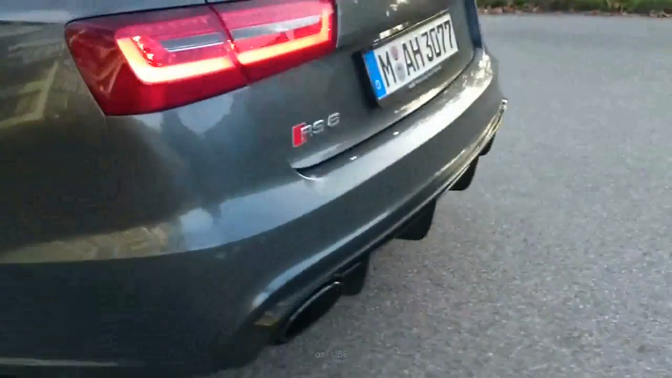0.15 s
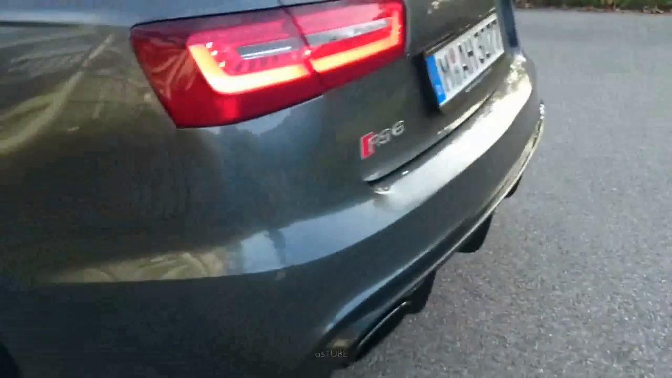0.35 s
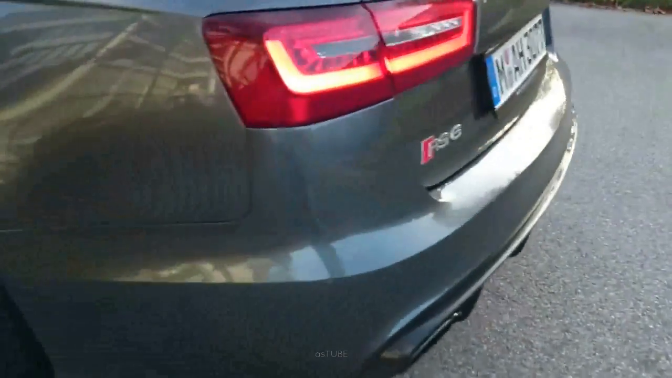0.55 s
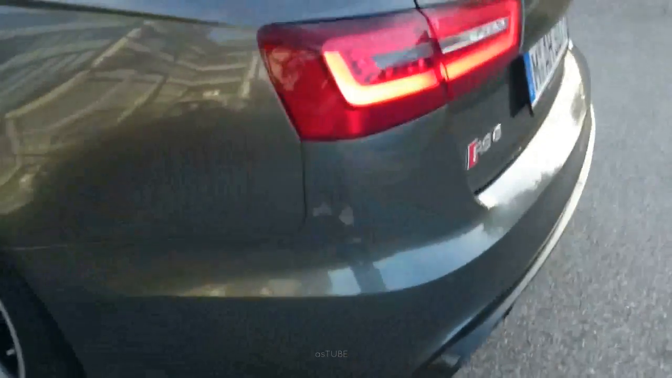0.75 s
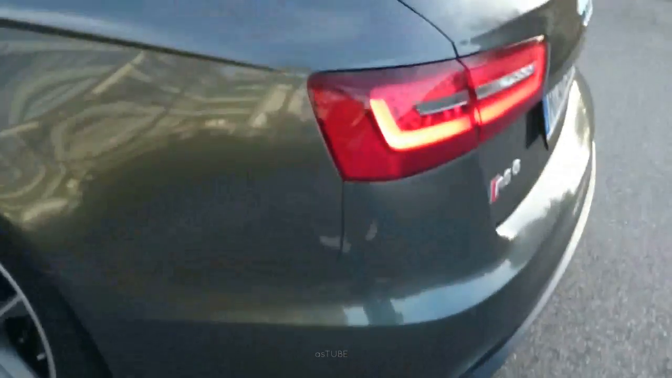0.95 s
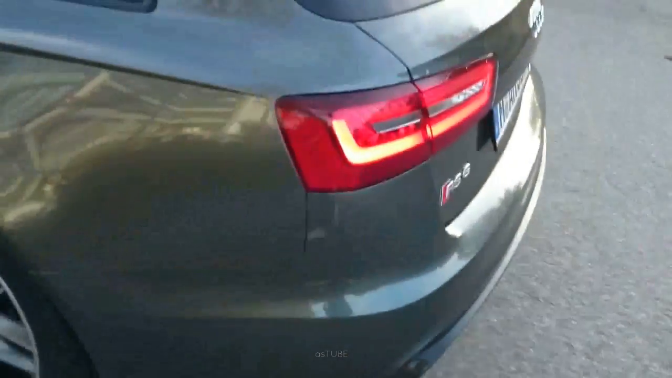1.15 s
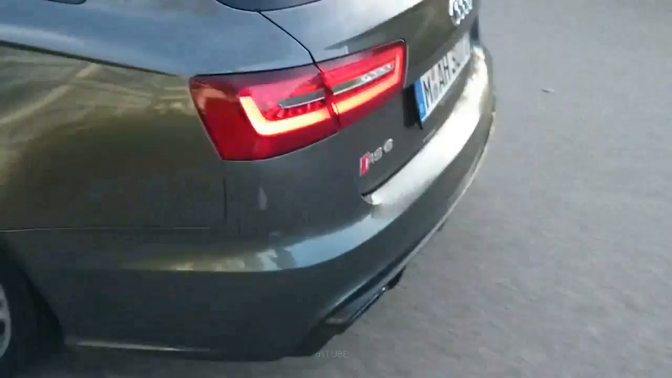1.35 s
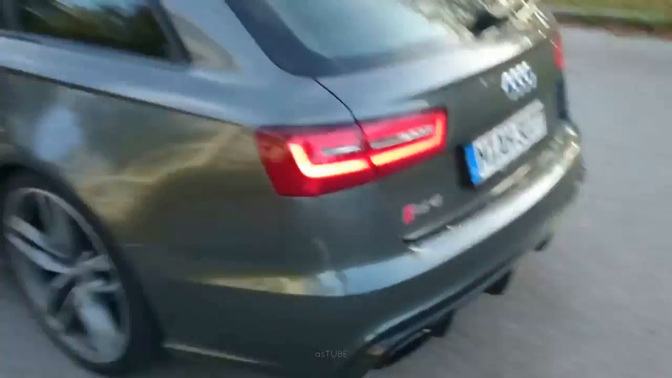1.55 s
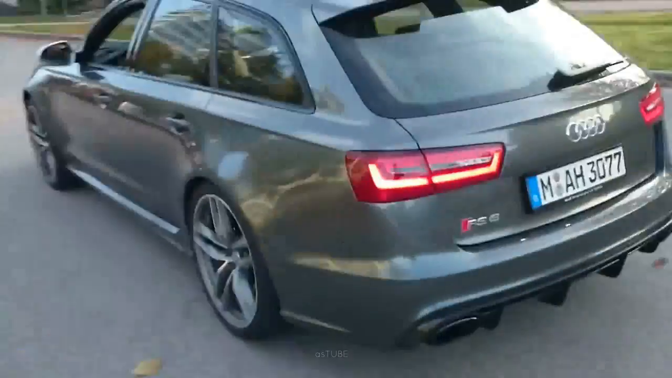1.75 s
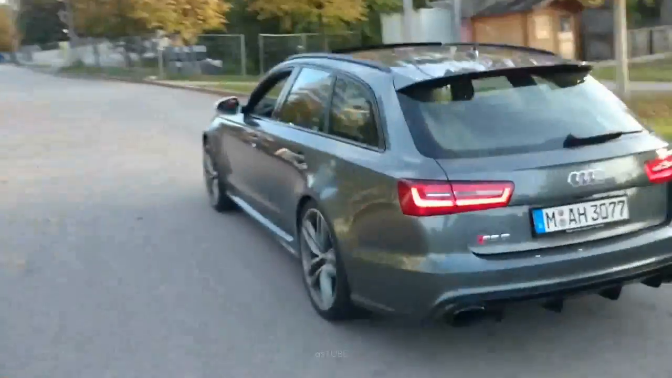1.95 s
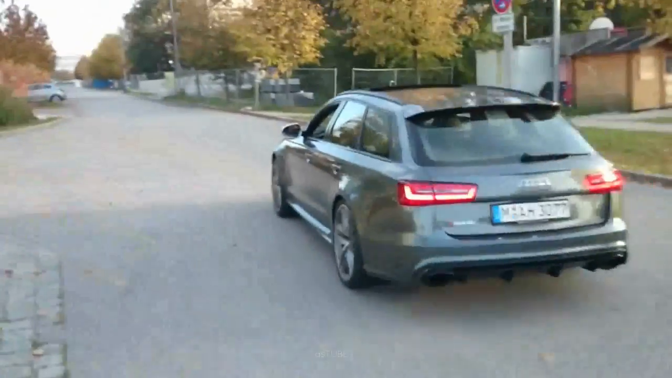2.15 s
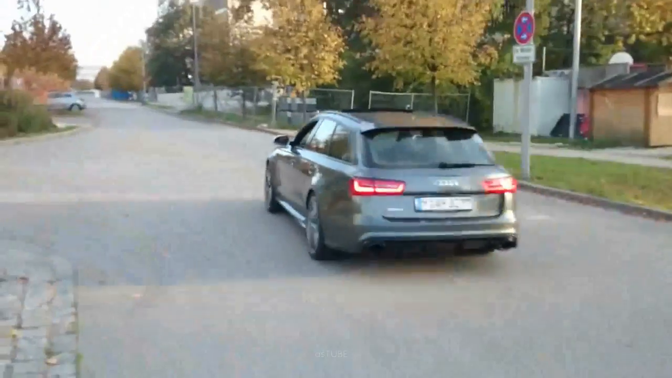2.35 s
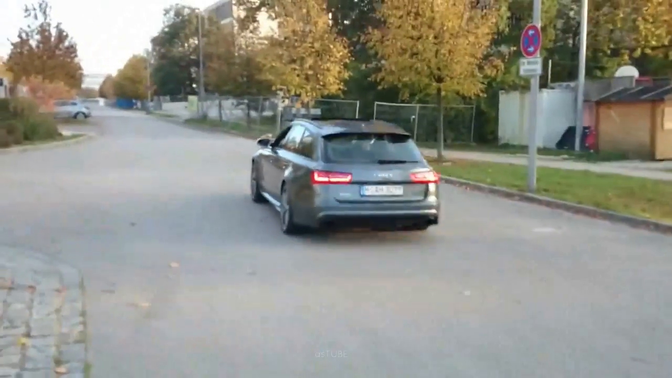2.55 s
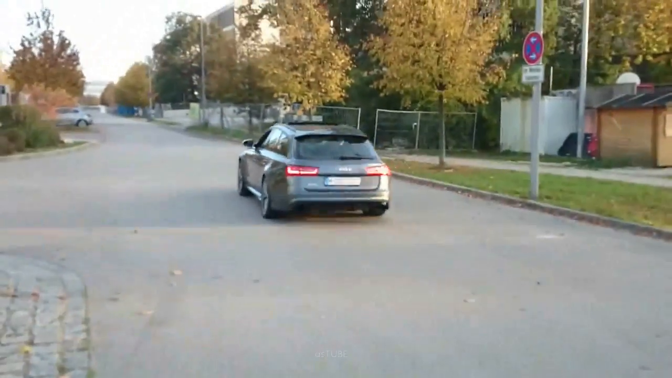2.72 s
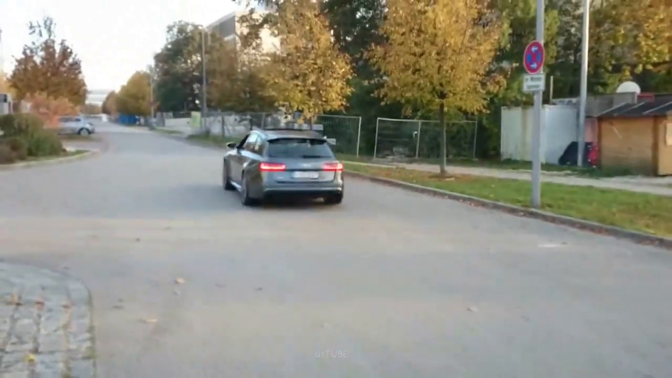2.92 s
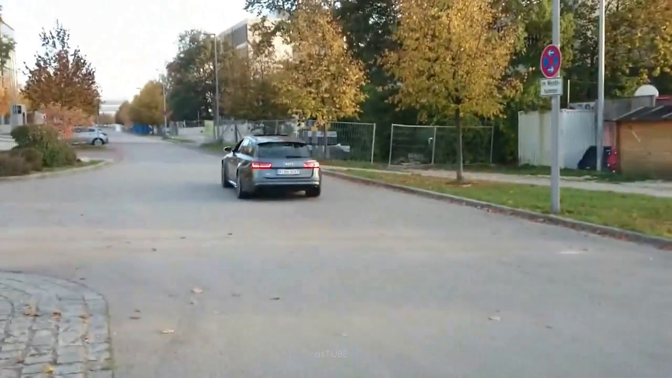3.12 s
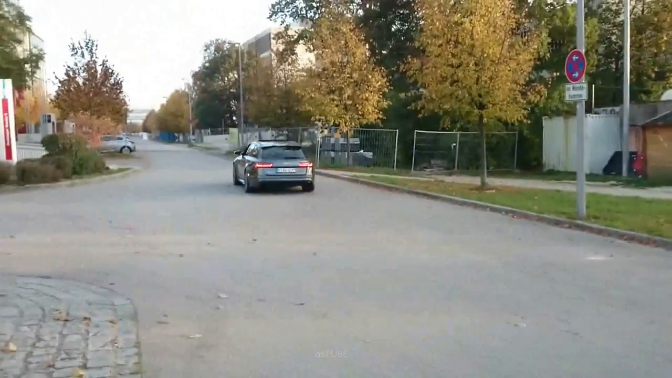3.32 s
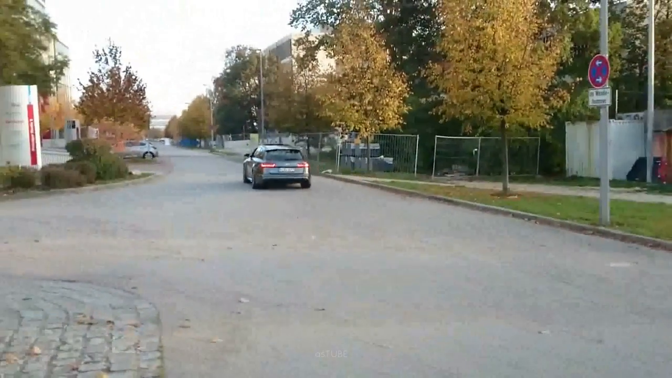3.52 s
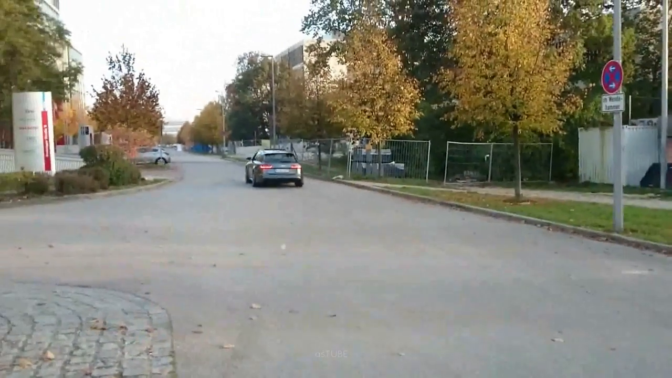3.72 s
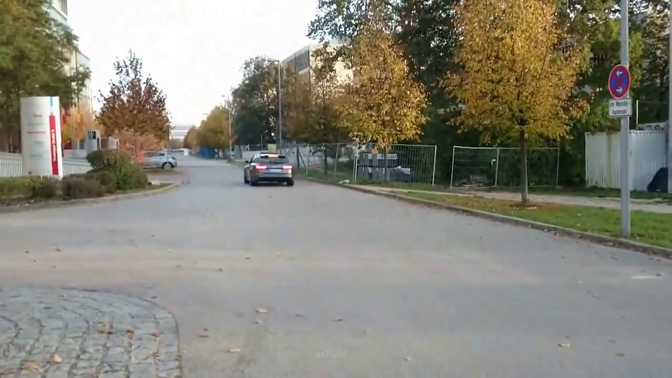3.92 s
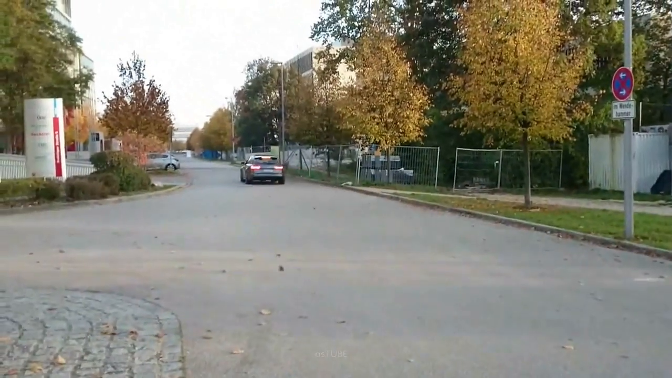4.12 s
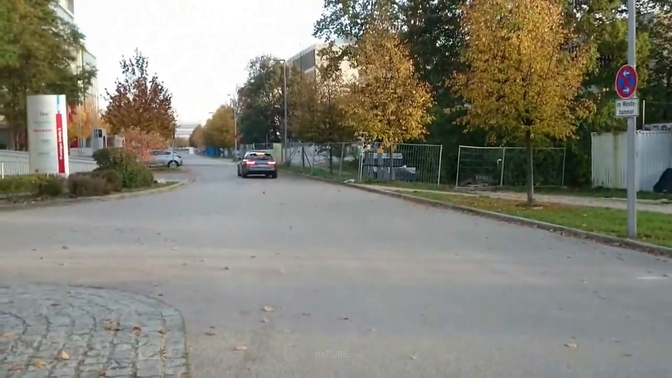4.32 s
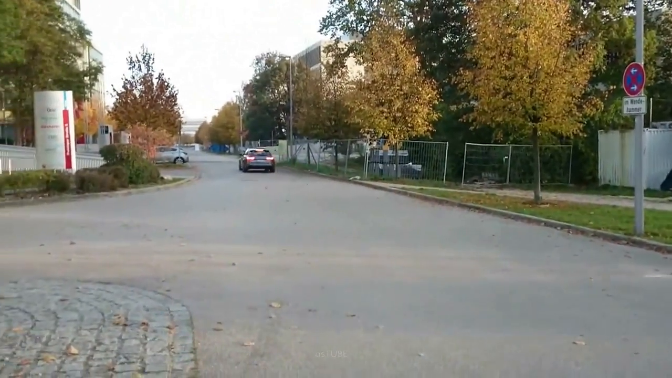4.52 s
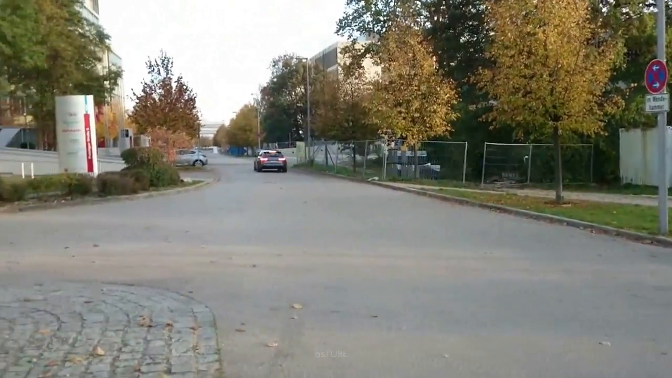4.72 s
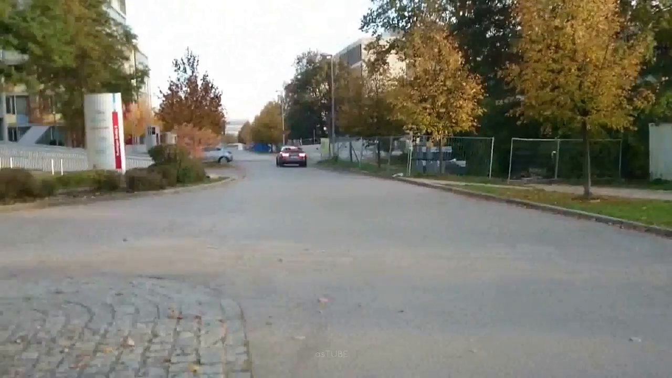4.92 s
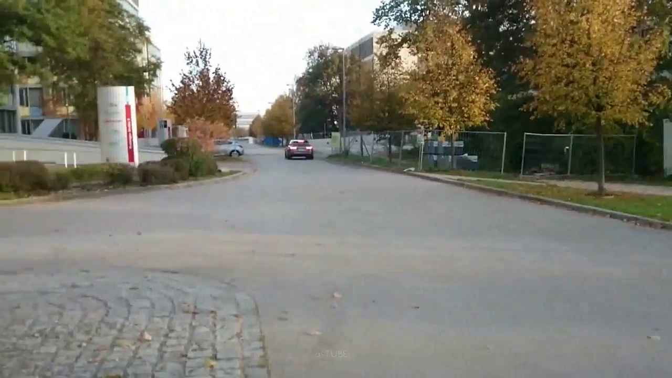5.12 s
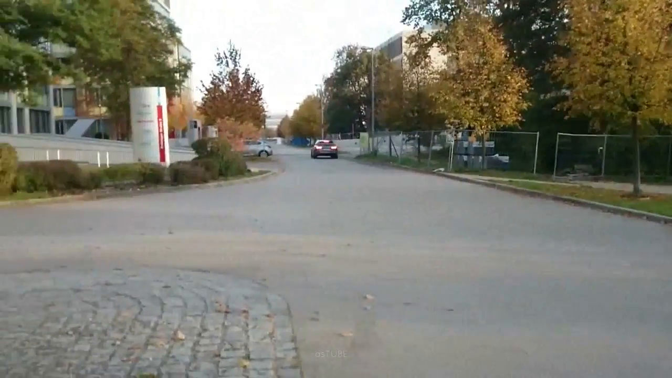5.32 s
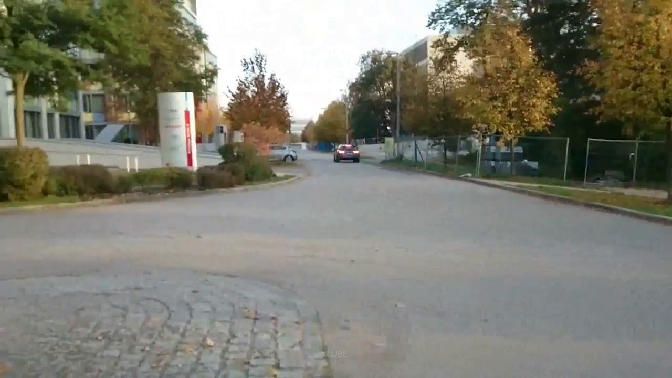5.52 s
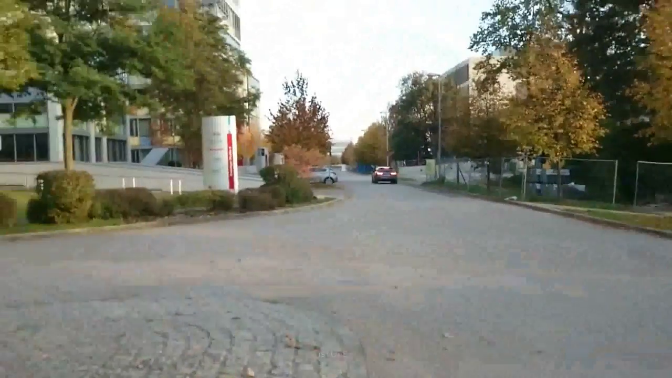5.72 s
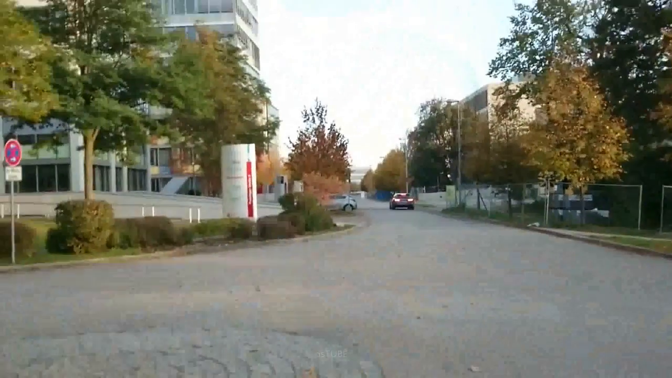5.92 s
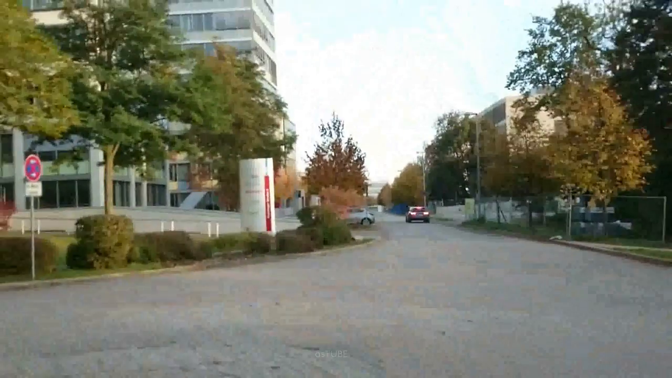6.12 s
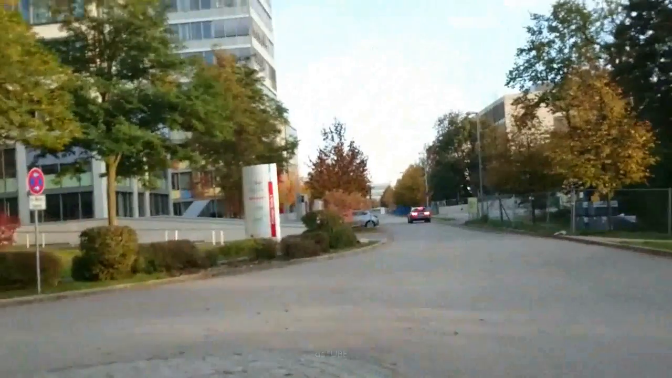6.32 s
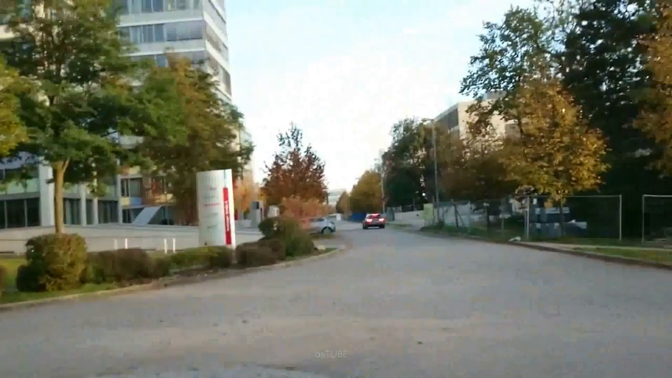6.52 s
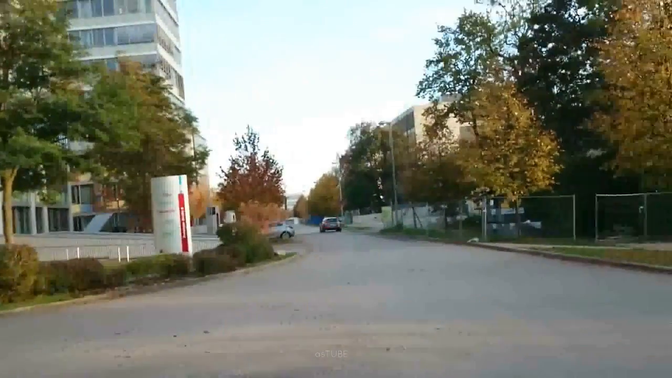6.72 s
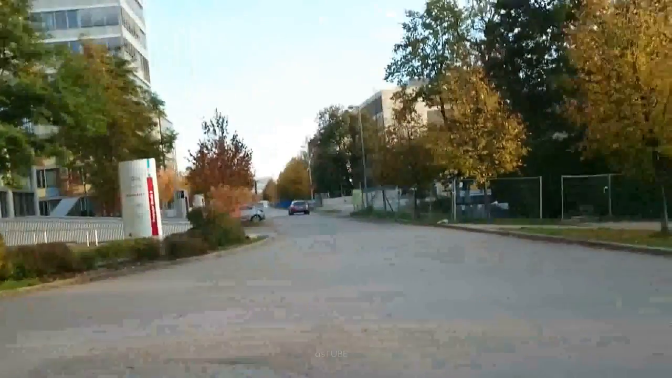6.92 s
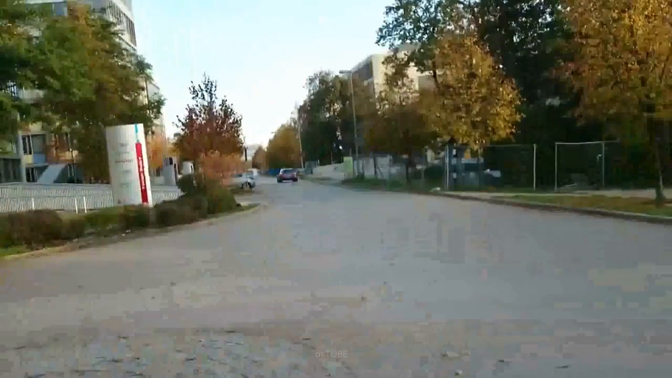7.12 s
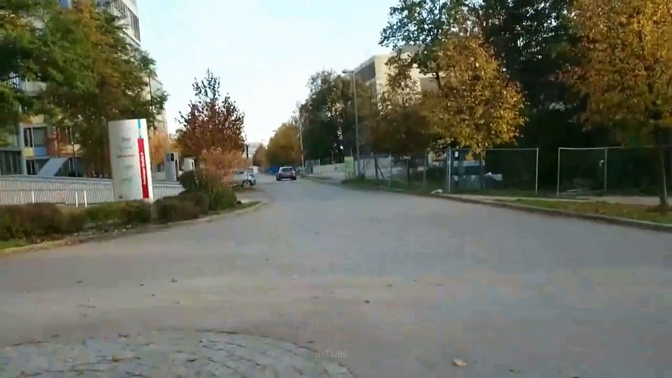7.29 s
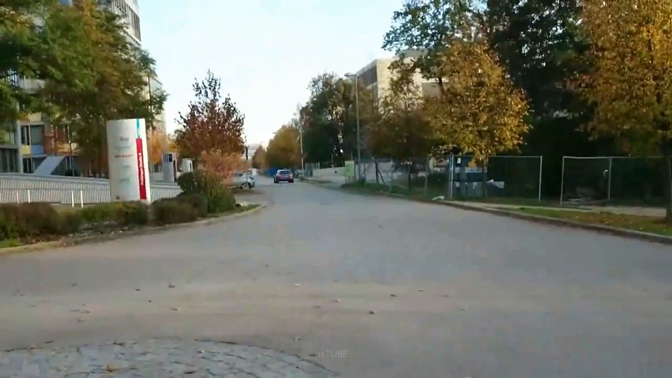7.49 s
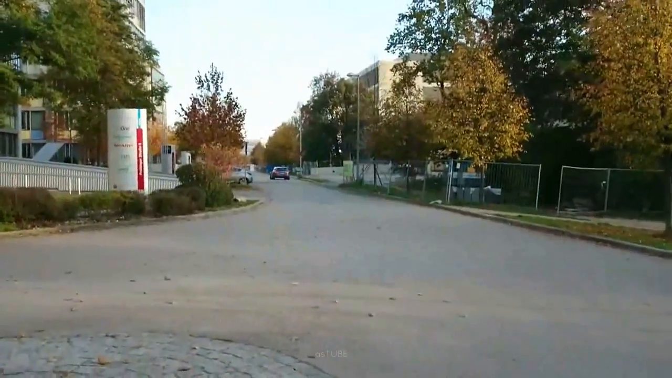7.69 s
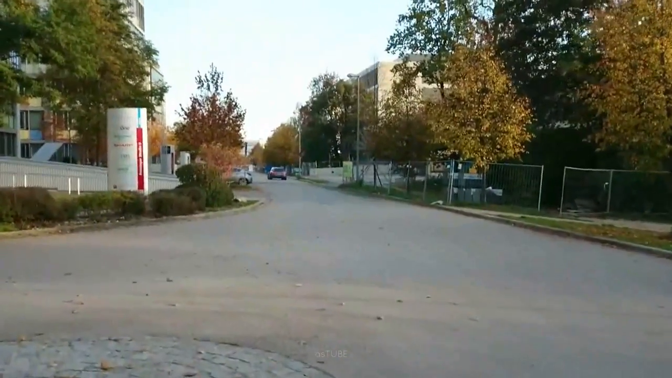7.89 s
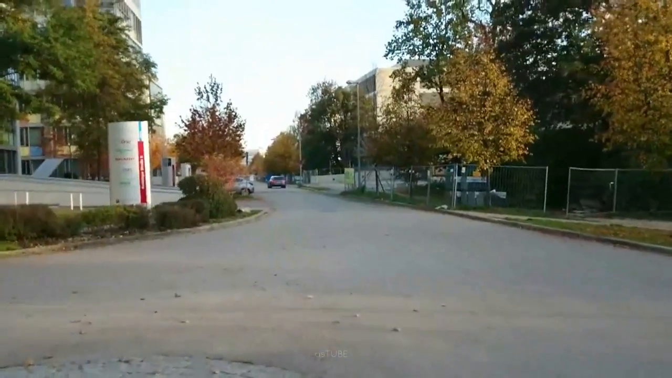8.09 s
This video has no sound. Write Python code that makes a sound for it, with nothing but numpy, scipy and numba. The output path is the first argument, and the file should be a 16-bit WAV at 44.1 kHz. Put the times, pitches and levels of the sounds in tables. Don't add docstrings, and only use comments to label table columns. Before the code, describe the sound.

Close to a handheld phone, a turbocharged V8 idles softly and unevenly for a second, then barks and pulls away, climbing into a raspy roar with bright turbine hiss. A brief ignition cut marks the upshift; the driver lifts and the exhaust crackles. Tyre roar recedes, a far blip brings more pops, and the quiet street remains, with wall echoes and light wind rumble.

```python
import sys
import numpy as np
from scipy import signal
from scipy.fft import rfft, irfft, next_fast_len
from scipy.io import wavfile
from scipy.ndimage import uniform_filter1d
from numba import njit

SR = 44100
rng = np.random.default_rng(int(sys.argv[2]) if len(sys.argv) > 2 else 0)


def voltage_ratio(level):
    return 10 ** (np.asarray(level, float) / 20)


def wav_record(signal):
    frames = np.transpose(np.atleast_2d(signal))
    bounded = np.clip(frames, -1, 1)
    quanta = np.round(bounded * 32767).astype(np.int16)
    wavfile.write(sys.argv[1], SR, quanta)


N = 359396
PADDED = next_fast_len(N, real=True)
T = np.arange(N) / SR

# start in seconds, state of the engine.
PEDAL = [(0, "idle"), (1.065, "pull"), (3.615, "cut"), (3.71, "pull"), (4.01, "lift"), (4.36, "overrun"),
         (5.08, "coast"), (5.2, "drone"), (5.62, "coast"), (5.84, "blip"), (6.08, "overrun"),
         (6.74, "coast"), (7.18, "drone"), (7.6, "feather")]
SHIFT_S, LIFT_S = PEDAL[2][0], PEDAL[4][0]


def by_state(table):
    starts, states = zip(*PEDAL)
    now = np.searchsorted(starts, T, side="right") - 1
    values = np.array([table[state] for state in states], float)[now].T
    return uniform_filter1d(values, int(0.045 * SR), mode="nearest")


# tilt in dB per order, roughness from 0 to 1.
BURN = dict(idle=(0, .12), pull=(0, .08), cut=(-.5, .2), lift=(-1.5, .6), overrun=(-1.8, .85),
        coast=(-4.5, .15), drone=(-6, .06), blip=(0, .1), feather=(.3, .08))
# frequency in Hz, level in dB per Hz.
RASP = [(150, -15.5), (250, -6), (308, -12), (412, -10), (490, -5.5), (576, -3), (770, -12), (983, -8.5),
        (1820, -18.5), (4000, -19), (5200, -19.5), (8800, -120)]
# frequency in Hz, level in dB per Hz.
JET = [(1470, -9), (2500, -11), (3320, -20), (4430, -14.5), (4860, -5), (5250, -0.5), (5450, 3.5),
       (5930, -2), (6850, -8.5), (8490, -6), (8950, -12), (10400, -15), (11200, -21), (13000, -14),
       (15500, -25)]
LOAD_START_S, LOAD_FULL_S = 1.06, 1.16
BITE_S = 1.12
STRONGEST_S, GUST_S = 0.301, 1.698


def engine():
    hz = revs()
    cycles = np.cumsum(hz) / SR
    since_strongest = cycles - cycles[int(STRONGEST_S * SR)]
    since_gust = cycles - cycles[int(GUST_S * SR)]
    load = np.interp(T, [LOAD_START_S, LOAD_FULL_S], [0, 1])
    note_db, rasp_db, jet_db = levels(hz)

    tilt_db, rough = by_state(BURN)
    tilt_db = tilt_db - 0.04 * (T < SHIFT_S) * np.log2(hz / 28)
    tilt_db = tilt_db - 0.35 * bump(BITE_S, 0.13)
    idling = (1 - load) * idle(since_strongest)
    pulling = load * loaded(since_gust, hz, tilt_db, rough)
    pump = (1 - load) * voltage_ratio(-54.5 + 2.5 * walk(6)) * np.sin(2 * np.pi * 462 * T)
    shield = voltage_ratio(-35) * bump(1.27, 0.11) * np.sin(2 * np.pi * 345 * T)
    note = voltage_ratio(note_db) * (idling + pulling) + pump + shield

    share = np.clip((11 / hz) ** 1.3, 0.15, 0.5)
    rasp = voltage_ratio(rasp_db - 4.5 + 1.4 * walk(24.63)) * gust(since_gust, 0.05 * share, 0.12)
    rasp = rasp * hiss(RASP, 270, 1100)
    jet = voltage_ratio(jet_db + walk(40)) * gust(since_gust, share, 0.065) * hiss(JET, 4000, 11000)
    bright = np.interp(T, [1.12, 1.4, 4.05, 4.9], [0, 1, 1, 0])
    dull_jet = signal.sosfiltfilt(signal.butter(6, 9300, fs=SR, output="sos"), jet)
    return note, rasp + bright * jet + (1 - bright) * dull_jet


CYLINDERS_DB = [0, -2, -6.5, -3, -8.5, -6, -2.2, -7]
# frequency in Hz, width in Hz, level in dB.
IDLE_PIPE = [(54.3, 23.7, 1.5), (92, 131, -2), (129.6, 109, -4)]


def idle(cycles):
    firing = np.floor(8 * cycles).astype(int)
    at = np.flatnonzero(np.diff(firing))
    strength, lateness = rng.standard_normal((2, len(at)))
    late_at = np.clip(at + (25 * lateness).astype(int), 0, N - 1)
    pulses = np.zeros(N)
    pulses[late_at] = voltage_ratio(np.take(CYLINDERS_DB, firing[at + 1] % 8) + 1.2 * strength)

    thud = np.zeros(N)
    for k, (hz, width, db) in enumerate(IDLE_PIPE):
        thud += (-1) ** k * voltage_ratio(db) * ring(pulses, hz, width)
    thud = dull(thud, 147, order=4)
    thud = -thud / np.std(thud[:SR])

    shake = ring(rng.standard_normal(N), 330, 260) + 0.89 * ring(rng.standard_normal(N), 300, 400)
    shaking = np.clip(thud, 0.2, None) ** 0.47 * unit(shake)
    rattle = unit(ring(rng.standard_normal(N), 900, 1100))
    rattling = np.clip(thud - 1.2, 0, None) ** 2 * rattle
    return thud + voltage_ratio(-44) * dull(rattling, 1500, order=4) + voltage_ratio(-29.5) * dull(shaking, 900, order=4)


# order (times per engine cycle), level in dB.
ORDERS_CRAWL = [(1, -32), (2, -18.5), (3, -17.5), (4, -16.5), (5, 3.5), (6, -20.5), (7, -11.5), (8, -4),
                (9, -9), (10, -26), (11, -18), (12, -29.5), (13, -19), (14, -30), (15, -30), (16, -24)]
ORDERS_SLOW = [(1, -9), (2, -10), (3, 0), (4, -4), (5, -2), (6, -6), (7, -13), (8, -7), (9, -8), (10, -20),
               (11, -15), (12, -24), (13, -23), (14, -20), (15, -31), (16, -24)]
ORDERS_MID = [(1, -15), (2, -7), (3, 0), (4, -1), (5, -6), (6, -12), (7, -21), (8, -18), (9, -9), (10, -18),
              (11, -16), (12, -22), (13, -23), (14, -25), (15, -27), (16, -26)]
ORDERS_RISE = [(1, -15), (2, -7), (3, 0), (4, -1), (5, -8), (6, -17), (7, -17), (8, -14), (9, -10),
               (10, -27), (11, -25), (12, -25), (13, -23), (14, -28), (15, -24), (16, -21)]
ORDERS_CLIMB = [(1, -12), (2, -7), (3, -2), (4, 0), (5, 0), (6, -4), (7, -18), (8, -13), (9, -8), (10, -15),
                (11, -15), (12, -14), (13, -15), (14, -13), (15, -18), (16, -14)]
ORDERS_TOP = [(1, -28), (2, -12), (3, -3), (4, 0), (5, -1), (6, -5), (7, -12), (8, -4), (9, 1), (10, -12),
              (11, -6), (12, -5), (13, -11), (14, -16), (15, -14), (16, -18)]
ORDERS_PEAK = [(1, -21), (2, -13), (3, -4), (4, 0), (5, -2), (6, -7), (7, -13), (8, -3), (9, -4), (10, -10),
               (11, -4), (12, -9), (13, -14), (14, -18), (15, -17), (16, -17)]
ORDERS_SECOND = [(1, -21), (2, -13), (3, -7), (4, 0), (5, -5), (6, -4), (7, -18), (8, -12), (9, -15),
                 (10, -22), (11, -12), (12, -17), (13, -18), (14, -18), (15, -15), (16, -19)]
ORDERS_FAR = [(1, -22), (2, -9), (3, 0), (4, -4), (5, -1), (6, -3), (7, -21), (8, -21), (9, -28), (10, -25),
              (11, -22), (12, -27), (13, -17), (14, -26), (15, -29), (16, -24)]
ORDERS_CUT = [(1, -6), (2, 0), (3, -4), (4, -5), (5, -9), (6, -9), (7, -19), (8, -11), (9, -10), (10, -11),
              (11, -13), (12, -11), (13, -11), (14, -13), (15, -9), (16, -10)]
ORDERS_BLIP = [(1, -17), (2, -15), (3, -1), (4, 0), (5, -6), (6, -5), (7, -26), (8, -23), (9, -23),
               (10, -30), (11, -15), (12, -21), (13, -12), (14, -24), (15, -19), (16, -20)]
ORDER_SPEEDS_HZ = [11, 18.2, 22, 30, 39, 46, 51]
# change in dB, one row per table above.
UPPER_DB = [
    [-24],
    [-23],
    [-15],
    [-12],
    [-8],
    [-10],
    [-10],
    [-8],
    [-16],
    [-8],
    [-12],
]


def loaded(cycles, hz, tilt_db, rough):
    tables = np.array([ORDERS_CRAWL, ORDERS_SLOW, ORDERS_MID, ORDERS_RISE, ORDERS_CLIMB, ORDERS_TOP,
                       ORDERS_PEAK, ORDERS_SECOND, ORDERS_FAR, ORDERS_CUT, ORDERS_BLIP])[:, :, 1]
    tables = np.hstack([tables, tables[:, -8:] + UPPER_DB])
    far = np.interp(T, [4.0, 4.1], [0, 1])
    second = np.interp(T, [3.6, 3.63], [0, 1])
    cut = np.interp(T, [3.615, 3.635, 3.7, 3.725], [0, 1, 1, 0])
    blip = np.interp(T, [5.8, 5.9, 6.1, 6.15], [0, 1, 1, 0])
    note, power = 0, 0
    for k, db in enumerate(tables.T, start=1):
        second_db, far_db, cut_db, blip_db = db[7:]
        first_db = np.interp(hz, ORDER_SPEEDS_HZ, db[:7])
        gear_db = second_db + cut * (cut_db - second_db)
        near_db = first_db + second * (gear_db - first_db)
        distant_db = far_db + blip * (blip_db - far_db)
        steps = np.where(far > 0, abs(k - 3), k - 3)
        gain = voltage_ratio(near_db + far * (distant_db - near_db) + tilt_db * steps)
        delay = 0.12 + 0.05 * k
        slip = 1.1 * rough * np.sqrt(k) * (1 + (k > 9)) * walk(16)
        wobble = voltage_ratio(9 * rough * walk(18))
        note = note + gain * wobble * np.sin(2 * np.pi * k * (cycles - delay) + slip)
        power = power + gain ** 2 / 2
    return note / np.sqrt(power)


# moment in seconds, size in dB above the usual.
HARD_GUSTS = [(1.241, 3), (1.307, 8.5), (1.643, 2), (1.7, 6.5), (1.753, 6), (1.862, 2.5), (1.916, 2.5),
              (2.013, 0), (1.968, 0.5), (1.53, 0), (2.06, -2.5)]


def gust(cycles, share, width):
    turn = (cycles + 0.44) % 1 - 0.5
    count = np.floor(cycles + 0.44).astype(int)
    size_db = 1.6 * rng.standard_normal(N // 100)
    for s, extra_db in HARD_GUSTS:
        size_db[count[int((s + 0.005) * SR)]] = extra_db
    side_width = np.where(turn < 0, 0.6 * width, 1.7 * width)
    return 1 - share + 1.58 * share * voltage_ratio(size_db)[count] * np.exp(-(turn / side_width) ** 2)


# (Hz, half the crank rate).
SPEED = [(1.04, 5.9), (1.325, 17.1), (1.5, 18.05), (1.8, 18.35), (2.18, 22.8), (2.55, 30.7), (3.08, 44.1),
         (3.35, 49.8), (3.56, 52.1), (3.6, 50), (3.625, 44), (3.7, 42), (3.76, 38.3), (3.9, 40.9),
         (4.05, 40.5), (5.5, 31.6), (7.65, 32.1), (8.15, 33.6)]
HUNT_S = 0.9


def revs():
    hunting = 5.78 + 0.28 * np.cos(2 * np.pi * (T - 0.37) / HUNT_S)
    since = T - 5.8
    rise_s, hold_s, sag_s = 0.21, 0.53, 0.33
    blip = np.clip(since / rise_s, 0, 1) * np.exp(-np.clip(since - rise_s - hold_s, 0, None) / sag_s)
    return np.where(T < SPEED[0][0], hunting, along(SPEED)[0] + 7.7 * blip)


# exhaust note in dB, throttle from 0 shut to 1 open, extra rasp in dB.
PUSH = dict(idle=(-16.5, 0, 0), pull=(-8.5, 0.9, 0), cut=(-8.5, 1, 0.78), overrun=(-38.5, 0, 0),
        lift=(-30.5, 0, 0), coast=(-37, 0, -5.5), drone=(-31.5, 0, -8), blip=(-24, 0, 0.69),
        feather=(-31, 0, 4.4))
# moment in seconds, change in level in dB.
AWAY = [(3.3, 2), (4.14, -9.5), (5.3, -16.5), (6.35, -21), (6.67, -35), (8.15, -38.5)]
IDLE_RASP_DB, IDLE_JET_DB = -63, -78


def levels(hz):
    note_db, throttle, extra_db = by_state(PUSH)
    loss_db, = along(AWAY)
    swell_db = 3 * np.cos(2 * np.pi * (T - 0.39) / HUNT_S)
    swell_db = swell_db - 18.5 * np.clip(1 - T / 0.17, 0, 1)
    note_db = note_db + (1 - throttle) * (T < SHIFT_S) * swell_db
    note_db = note_db + 3.5 * bump(BITE_S, 0.04)
    note_db = note_db - 2.5 * throttle * np.log2(np.maximum(hz / 18, 1))
    note_db = note_db + 0.29 * loss_db

    short_db = -15.5 * np.exp(-(T - 1.3) / 0.51)
    revving = voltage_ratio(-11 + 13 * np.log2(np.minimum(hz, 45) / 46))
    rasp_open = 20 * np.log10(np.hypot(voltage_ratio(-29), revving)) + 0.35 * short_db
    rasp_shut = -25 + loss_db
    rasp_db = rasp_shut + throttle * (rasp_open - rasp_shut) + extra_db

    rundown_db = 18 * np.exp(-np.clip(T - LIFT_S, 0, None) / 0.5)
    jet_open = -16.5 + short_db + 0.69 * loss_db
    jet_shut = -48.5 + 0.69 * loss_db + rundown_db
    jet_db = jet_shut + throttle * (jet_open - jet_shut)

    rush = 1 - np.exp(-np.clip(T - LOAD_START_S, 0, None) / 0.033)
    rasp_db = IDLE_RASP_DB + rush * (rasp_db - IDLE_RASP_DB)
    return note_db, rasp_db, IDLE_JET_DB + rush * (jet_db - IDLE_JET_DB)


# moment in seconds, crack level in dB, thump level in dB, sizzle level in dB.
POPS = [(4.4065, -11, -22, -35), (4.45, -16, -23, -36), (4.465, -21, -24, -43), (4.492, -20, -32, -46),
        (4.514, -17, -24, -44), (4.564, -17, -30, -44), (4.62, -29, -30, -48), (4.667, -6, -22, -24),
        (4.7, -28, -28, -33), (4.711, -20, -28, -39), (4.737, -26, -27, -48), (4.774, -28, -25, -44),
        (4.822, -28, -28, -50), (4.87, -9, -24, -31), (4.884, -19, -24, -41), (4.934, -25, -26, -46),
        (4.967, -21, -28, -48), (4.999, -23, -29, -49), (5.694, -27, -39, -54), (6.202, -28, -26, -42),
        (6.269, -8, -24, -56), (6.284, -24, -30, -54), (6.334, -28, -32, -50), (6.345, -16, -29, -40),
        (6.424, -15, -29, -41), (6.436, -17, -28, -50), (6.46, -29, -35, -52), (6.49, -16, -27, -45),
        (6.541, -16, -29, -29), (6.591, -34, -31, -52), (6.861, -32, -44, -62)]
# frequency in Hz, level in dB per Hz.
SIZZLE = [(880, -33), (1500, -10), (2280, -25), (3500, -1), (5210, 4.5), (8110, -7.5), (12000, -27),
          (15600, -55), (22000, -120)]


def pops():
    t = np.arange(SR // 10) / SR
    body, fizz = np.zeros((2, N + len(t)))
    sizzle = hiss(SIZZLE, 4200, 9000)[0]
    spray = unit(ring(rng.standard_normal(N), 900, 1200))

    def tone(hz):
        return np.sin(2 * np.pi * hz * t)

    def swell(peak_s):
        return t / peak_s * np.exp(1 - t / peak_s)

    for s, crack_db, thump_db, sizzle_db in POPS:
        low, high = rng.random(2)
        start = int((s + 0.0012) * SR)
        at = slice(start, start + len(t))
        thump = -tone(72 + 55 * low) * swell(0.0038)
        crack = (-0.4 * tone(560) - tone(950 + 250 * high)) * np.exp(-t / 0.0021)
        crack = crack + 0.2 * spray[at] * np.exp(-t / 0.007)
        tailpipe = tone(480 + 150 * low) * np.exp(-t / 0.006)
        silencer_box = tone(192.3) * swell(0.0054) / 2
        box_neck = tone(820) * np.exp(-t / 0.0033)
        body[at] += voltage_ratio(thump_db + 5.5) * thump + voltage_ratio(crack_db - 1.5) * crack
        body[at] += voltage_ratio(thump_db + 4.5) * silencer_box
        body[at] -= voltage_ratio(crack_db - 9) * tailpipe + voltage_ratio(crack_db - 12.5) * box_neck
        fizz[at] += voltage_ratio(sizzle_db - 4) * sizzle[at] * (np.exp(-t / 0.0037) + 0.36 * np.exp(-t / 0.029))
    body -= 0.58 * ring(body, 344, 300)
    return dull(body[:N], 2700, order=3) + dull(fizz[:N], 13000, order=4)


# frequency in Hz, level in dB per Hz.
TYRE_ROAR = [(350, -41), (600, -16), (710, -24.5), (863, 3.5), (1010, 3), (1550, -2), (2170, -14),
             (2940, -20), (3630, -32.5), (5000, -43), (6500, -77), (11000, -120)]


def tyres():
    rise = np.interp(T, [2.5, 4.0], [0, 1])
    return rise * voltage_ratio(-19.5 + along(AWAY)[0] + 0.82 * walk(12)) * hiss(TYRE_ROAR, 897, 1700)


@njit
def walls(x, lags, gain, damp):
    line, soft, out = np.zeros((8, 8192)), np.zeros(8), np.zeros((2, len(x)))
    for i in range(len(x)):
        total = 0.
        for k in range(8):
            soft[k] += (1 - damp) * (gain[k] * line[k, (i - lags[k]) & 8191] - soft[k])
            total += soft[k]
            out[k % 2, i] += soft[k]
        for k in range(8):
            line[k, i & 8191] = x[i] + soft[k] - total / 4
    return out


# moment in seconds, level in dB, pitch in Hz, left minus right in dB.
TICKS = [
    (5.3906, -36.5, 5630, -7),
    (5.517, -41, 6100, -4),
    (5.597, -41.5, 6860, -4),
    (5.737, -39, 6000, 11),
    (5.7718, -34, 5060, 12),
    (6.472, -44, 4590, 4),
    (6.5006, -40, 5300, 13),
    (6.6486, -45.5, 5100, -8),
    (6.8086, -46, 4600, 10),
]
TWIG = [(7.536, -34.5, 2630, -0.84)]


def ticks():
    t = np.arange(SR // 20) / SR
    out = np.zeros((2, N))
    for s, db, hz, pan_db in TICKS + TWIG:
        at = slice(int(s * SR), int(s * SR) + len(t))
        snap = ring(ring(rng.standard_normal(len(t)), hz, 0.45 * hz), hz, 0.45 * hz)
        sides_db = np.array([[pan_db], [-pan_db]]) / 2
        out[:, at] += voltage_ratio(db - 6 + sides_db) * unit(snap) * np.exp(-t / 0.0028)
    start = int(5.688 * SR)
    out[:, start:start + len(t)] += voltage_ratio(-32) * np.sin(2 * np.pi * 410 * t) * np.exp(-t / 0.009)
    return out


# centre in seconds, level in dB, half length in seconds.
PUFFS = [
    (0.0, -11.5, 0.023),
    (0.54, -20.5, 0.79),
    (1.725, -21, 0.27),
    (2.707, -30, .35),
    (3.667, -22, 0.12),
    (4.766, -38, 0.42),
    (5.405, -36.5, 0.37),
    (6.302, -36, 0.5),
    (7.409, -46.5, 0.22),
]


def wind():
    band = signal.butter(3, [6, 24], "band", fs=SR, output="sos")
    buffeting = unit(signal.sosfilt(band, rng.standard_normal((2, N))))
    blow = voltage_ratio(-42.5) + sum(voltage_ratio(db) * bump(s, half_s) for s, db, half_s in PUFFS)
    return blow * voltage_ratio(np.array([2 * walk(7.2), 1 + 2 * walk(5.5)])) * buffeting


# frequency in Hz, level in dB per Hz.
TOWN = [(24, -26), (40, 0.5), (64, -6), (113, -4.5), (167, -14), (352, -23.5), (484, -22), (1120, -25),
        (2530, -37.5), (4460, -42.5), (4880, -41.5), (8040, -51), (9000, -58), (11700, -85.5),
        (19800, -120)]
# moment in seconds, level in dB.
TOWN_DB = [(0, -40.5), (.15, -48.5), (.43, -51.5), (.7, -43), (1.05, -43.5), (4, -36.5), (8.15, -45)]


def town():
    return voltage_ratio(along(TOWN_DB)[0] + 0.8 * walk(3.4)) * hiss(TOWN, 25, 12000)


# frequency in Hz, likeness from 0 to 1.
LIKENESS = [(60, 0.4), (130, 0.2), (290, 0.82), (640, 1), (1410, 0.72), (3100, 0.45), (6820, 0.19),
            (15000, 0.2)]


def hiss(spectrum, lo_hz, hi_hz):
    alike = np.clip(over_hz(LIKENESS), 0, 1)
    mid, side = rfft(rng.standard_normal((2, PADDED))) * voltage_ratio(over_hz(spectrum))
    shared, apart = mid * np.sqrt(1 + alike), side * np.sqrt(1 - alike)
    pair = np.array([shared + apart, shared - apart])
    band = slice(int(lo_hz * PADDED / SR), int(hi_hz * PADDED / SR))
    return irfft(pair, PADDED)[:, :N] * PADDED / np.sqrt(np.sum(abs(pair[:, band]) ** 2))


def along(table):
    s, *columns = np.transpose(table)
    return [np.interp(T, s, column) for column in columns]


def over_hz(table):
    hz, value = np.transpose(table)
    bins_hz = np.arange(PADDED // 2 + 1) * SR / PADDED
    return np.interp(np.log(bins_hz + 1), np.log(hz), value)


def bump(centre_s, half_s):
    return np.exp(-((T - centre_s) / half_s) ** 2)


def unit(x):
    return x / np.sqrt(np.mean(x ** 2))


def walk(rate):
    k = int(SR / rate)
    held = np.repeat(rng.standard_normal(N // k + 1), k)
    return unit(uniform_filter1d(uniform_filter1d(held, k), k)[:N])


def ring(x, hz, width):
    return signal.lfilter(*signal.iirpeak(hz, hz / width, fs=SR), x)


def dull(x, hz, order):
    return signal.sosfilt(signal.butter(order, hz, fs=SR, output="sos"), x)


def scene():
    note, gas = engine()
    bangs = pops()
    lags = rng.integers(900, 5000, 8)
    gain = voltage_ratio(-60 * lags / SR / 0.71)
    fronts = walls(0.46 * note + 0.6 * bangs + 0.37 * gas[0], lags, gain, 0.14)
    return note + bangs + gas + voltage_ratio(-8) * fronts + tyres() + ticks() + wind() + town()


def top_cut(x):
    return signal.sosfilt(signal.butter(12, 15670, fs=SR, output="sos"), x)


# frequency in Hz, left minus right in dB.
PORTS = [(22, -13), (46, -12), (64, -3), (130, -1.2), (300, .3), (700, 0), (1300, -2), (2400, 2.5),
         (5400, -7), (8200, 13.5), (12500, 7), (15000, 5)]


def record(dry):
    lean = voltage_ratio(np.array([[0.5], [-0.5]]) * over_hz(PORTS))
    ports = irfft(rfft(dry, PADDED) * lean * 2 / lean.sum(axis=0), PADDED)[:, :N]
    rounded = ports / (1 + abs(ports) ** 5) ** (1 / 5)
    rounded = signal.sosfilt(signal.ellip(10, 0.2, 60, 15670, fs=SR, output="sos"), rounded)
    bass = signal.sosfiltfilt(signal.butter(10, 2300, fs=SR, output="sos"), rounded)
    open_now = (np.arange(N) > 1.06 * SR) | (walk(14) > 0.5)
    kept = uniform_filter1d(1.0 * open_now, size=600)
    return top_cut(bass + kept * (rounded - bass))


dry = scene()
out = record(dry)
wav_record(out)
```